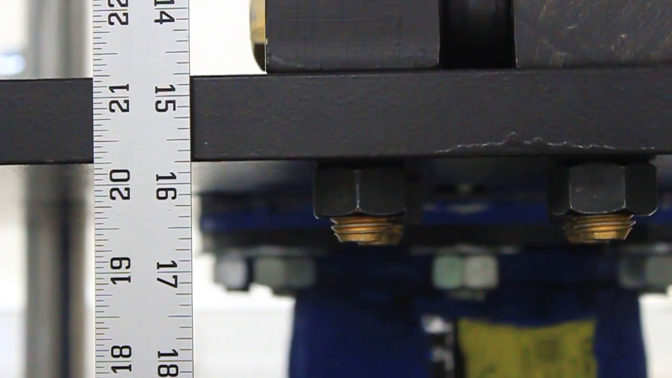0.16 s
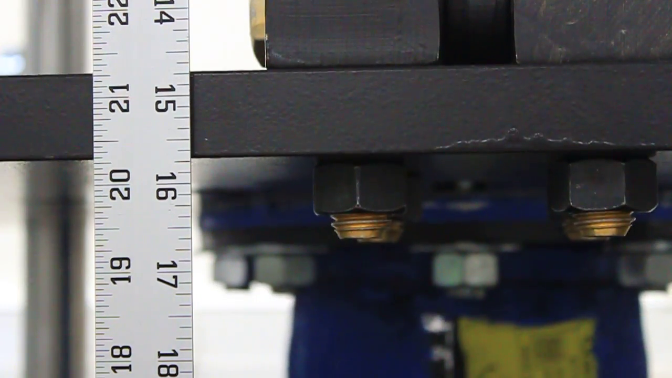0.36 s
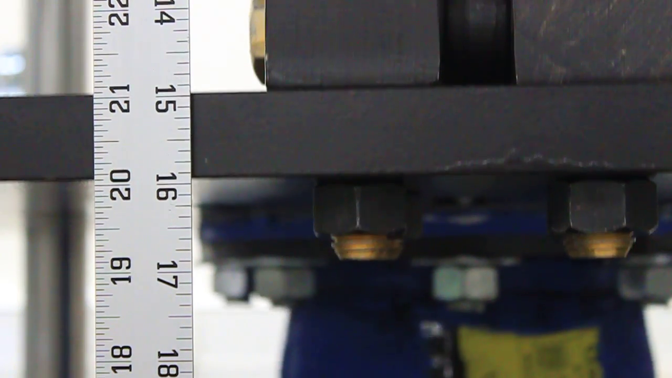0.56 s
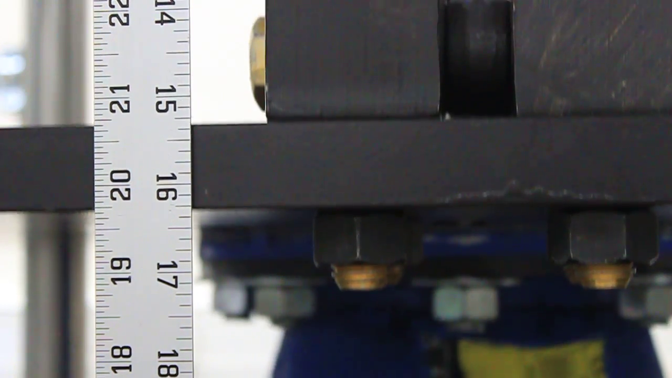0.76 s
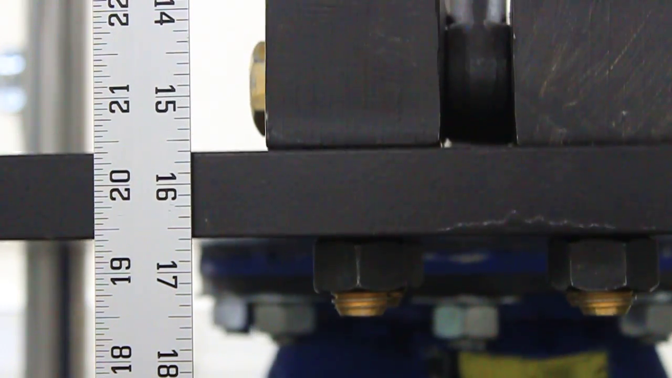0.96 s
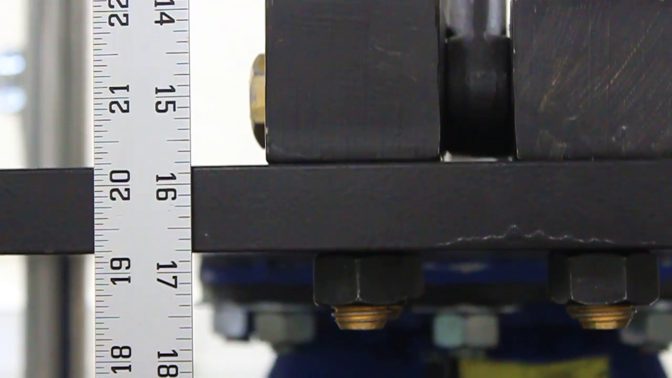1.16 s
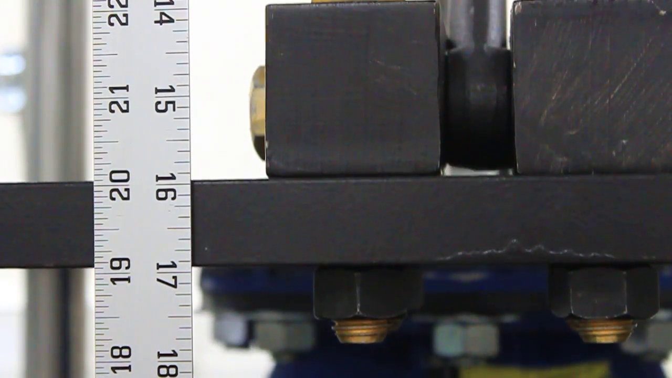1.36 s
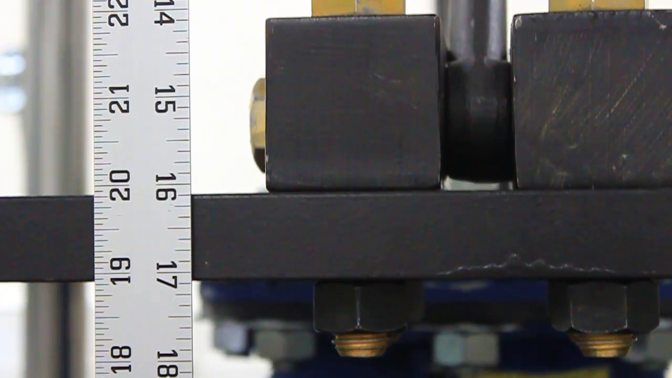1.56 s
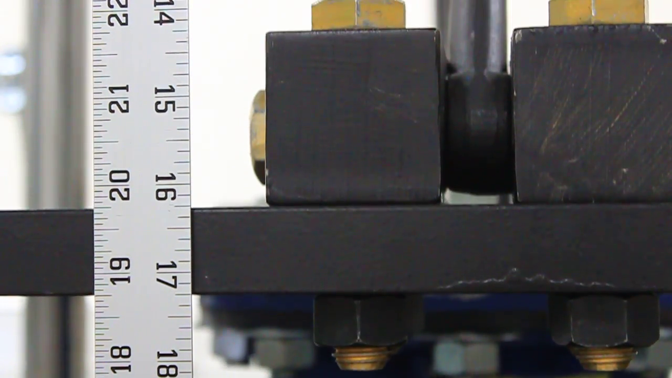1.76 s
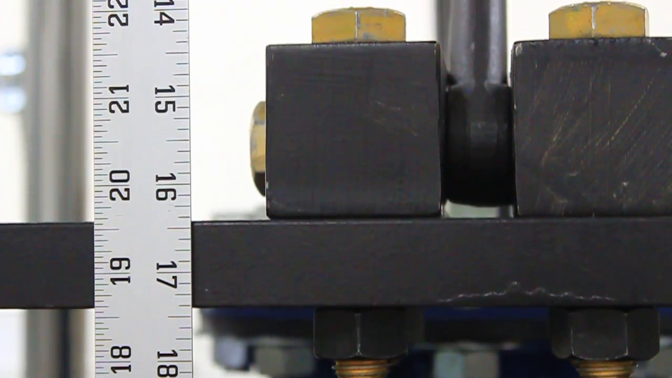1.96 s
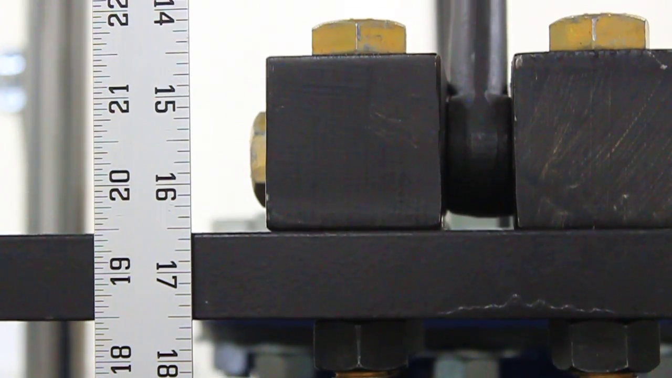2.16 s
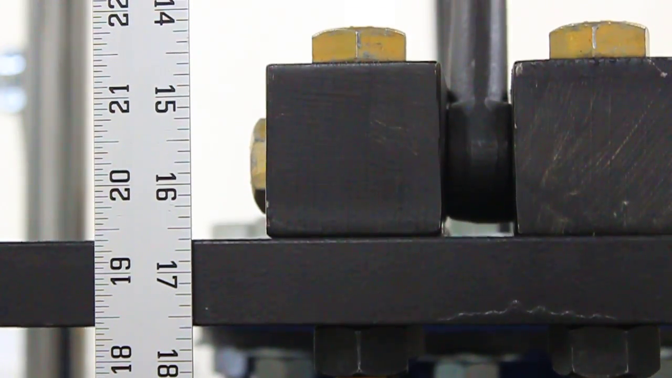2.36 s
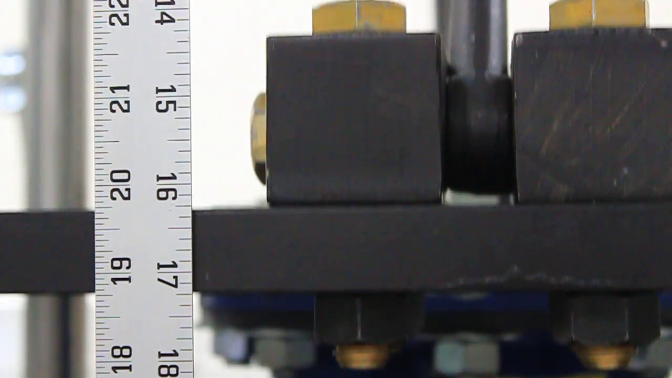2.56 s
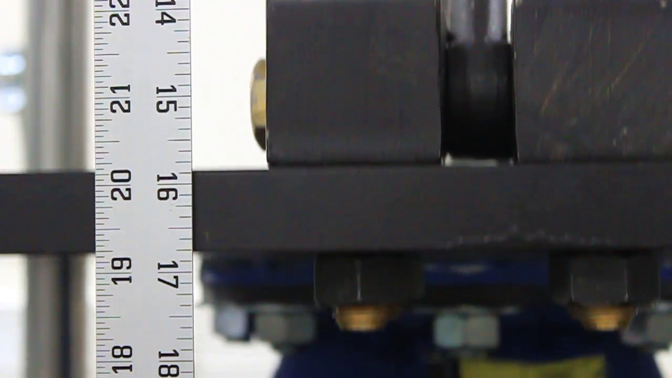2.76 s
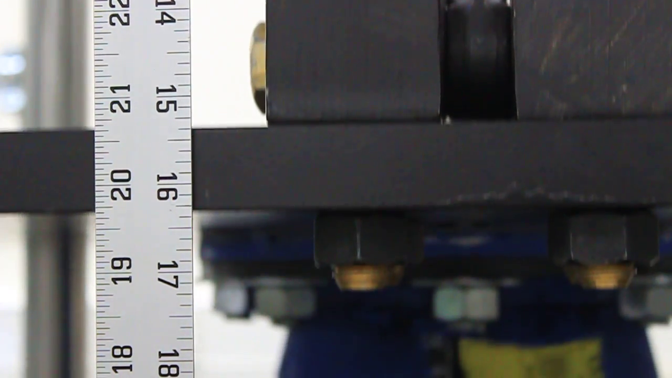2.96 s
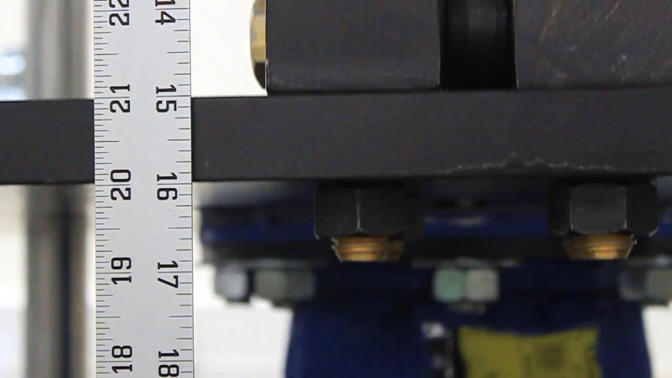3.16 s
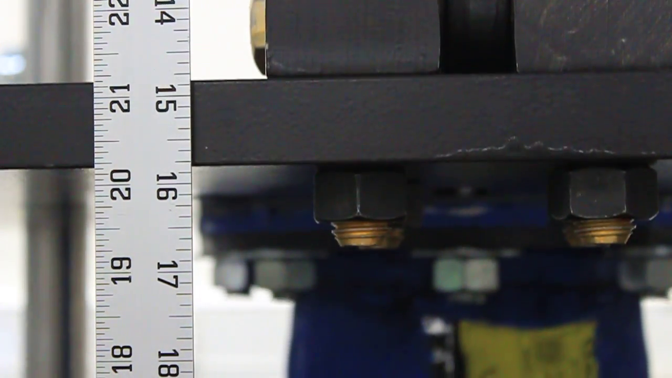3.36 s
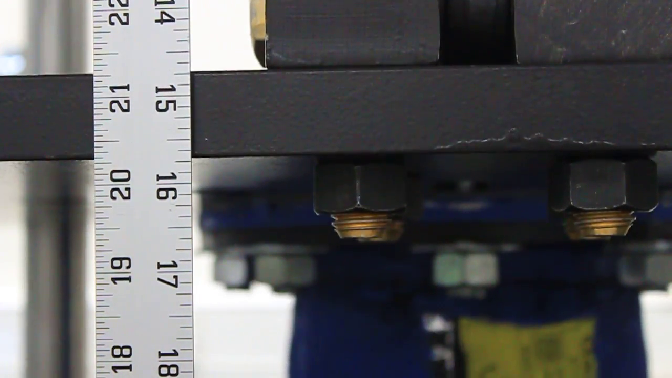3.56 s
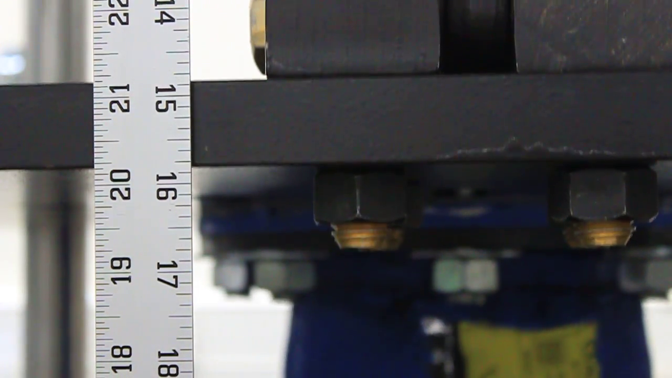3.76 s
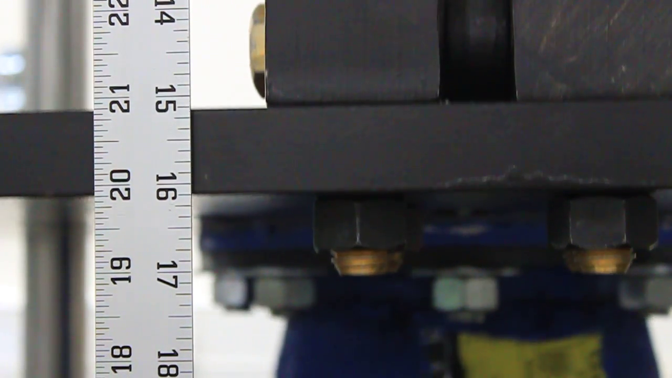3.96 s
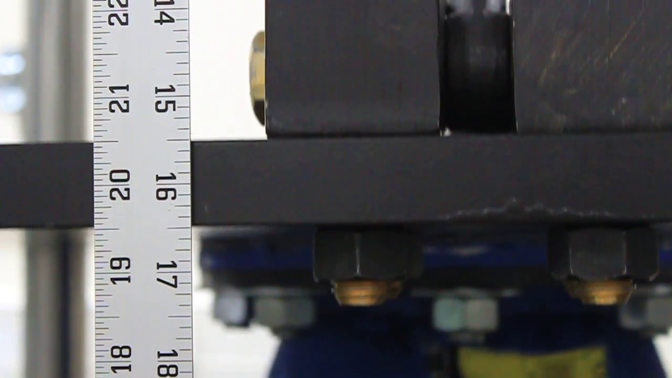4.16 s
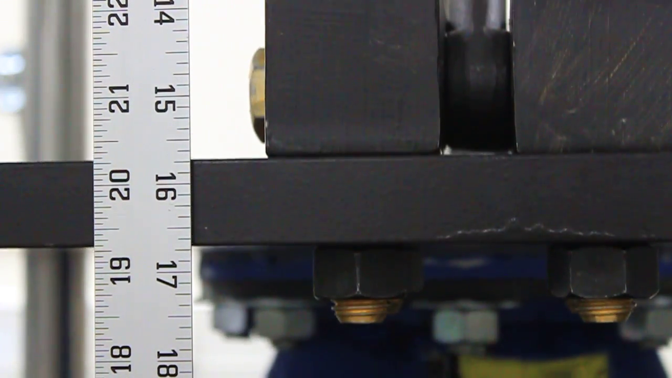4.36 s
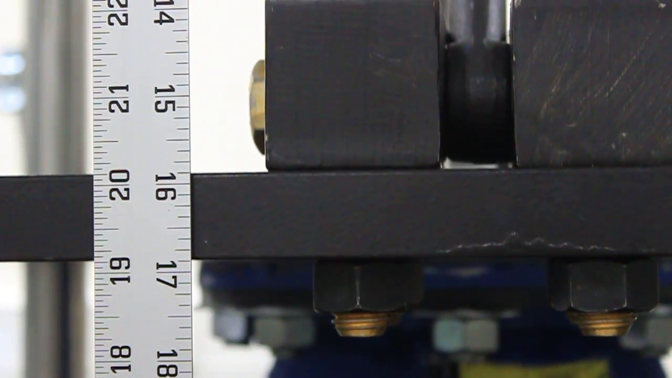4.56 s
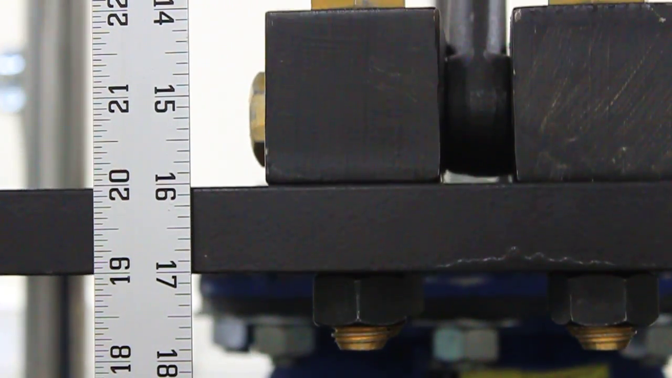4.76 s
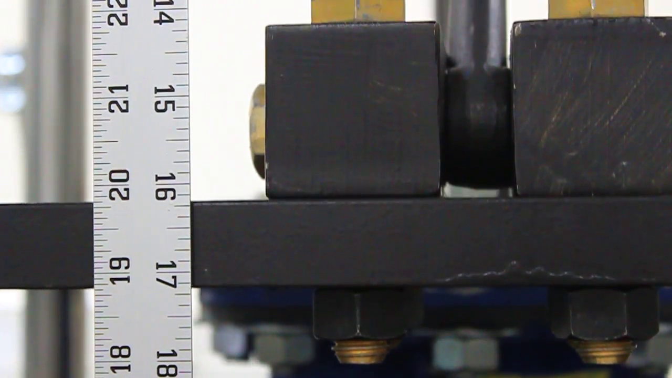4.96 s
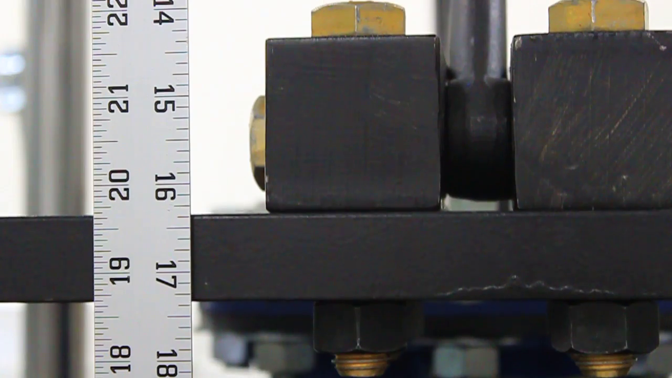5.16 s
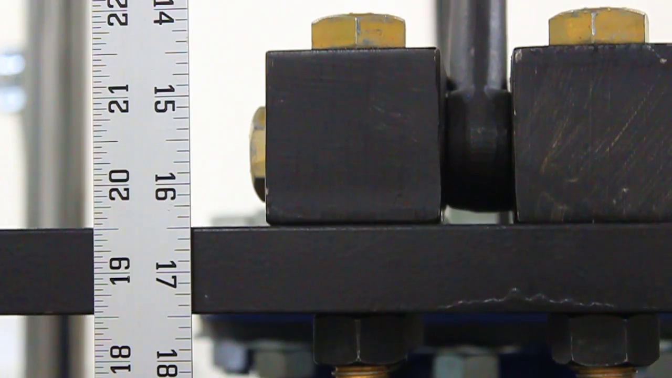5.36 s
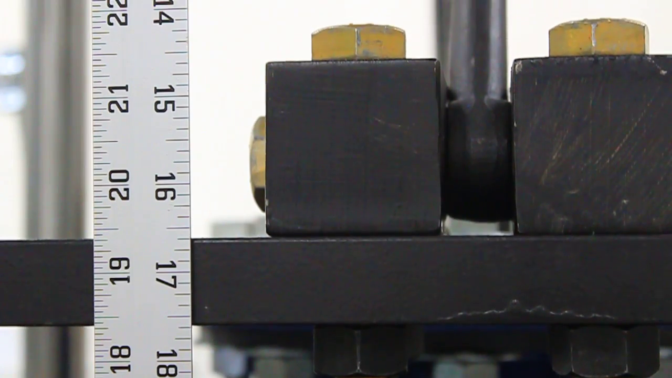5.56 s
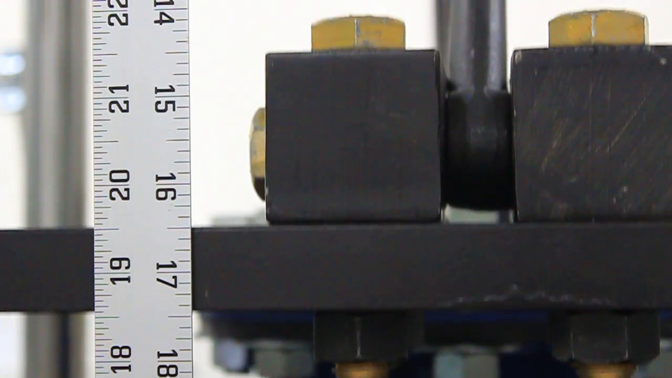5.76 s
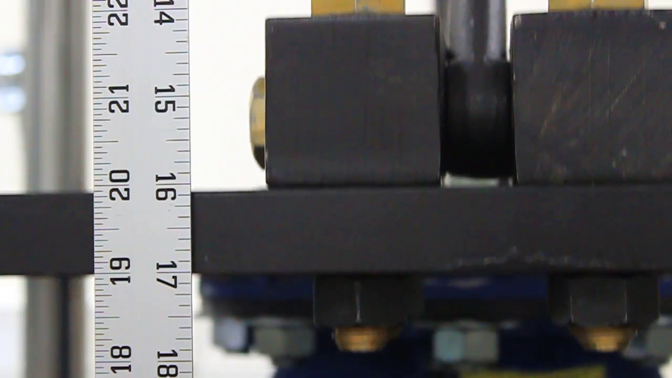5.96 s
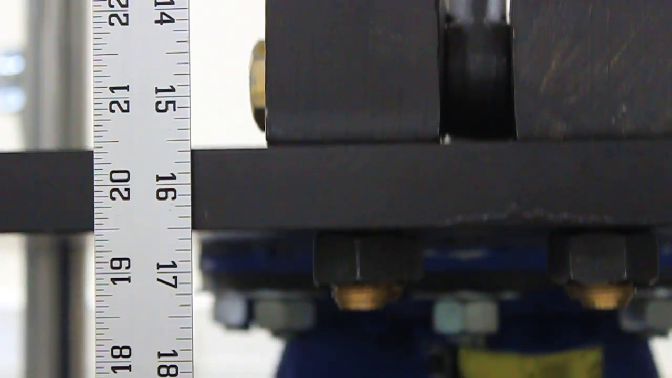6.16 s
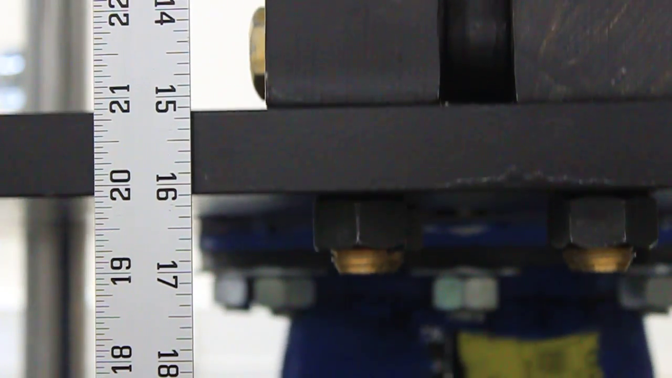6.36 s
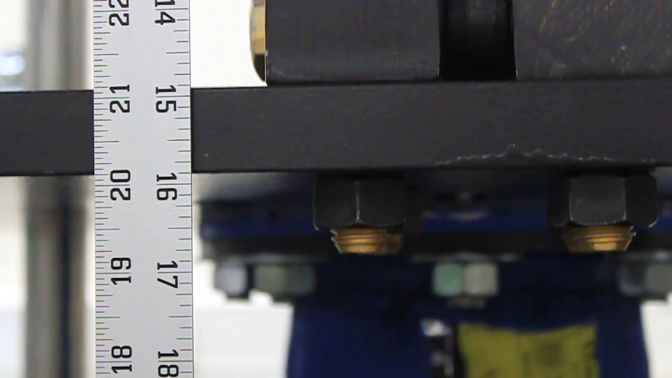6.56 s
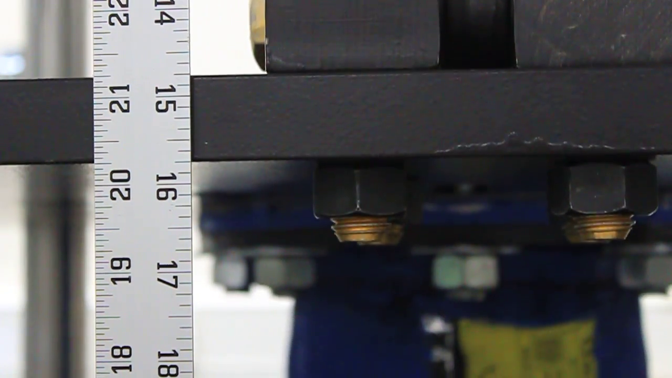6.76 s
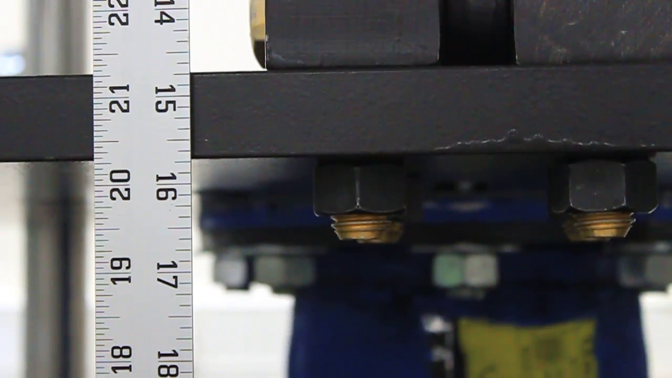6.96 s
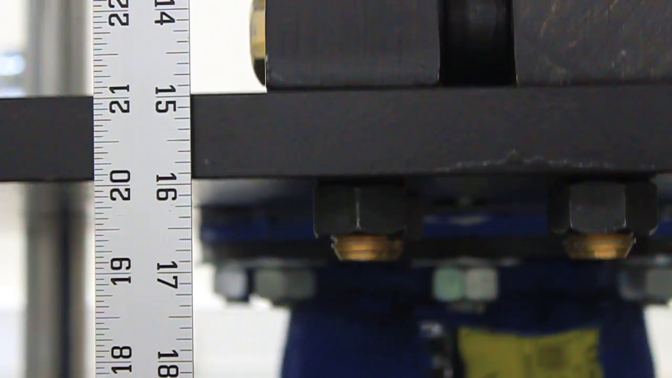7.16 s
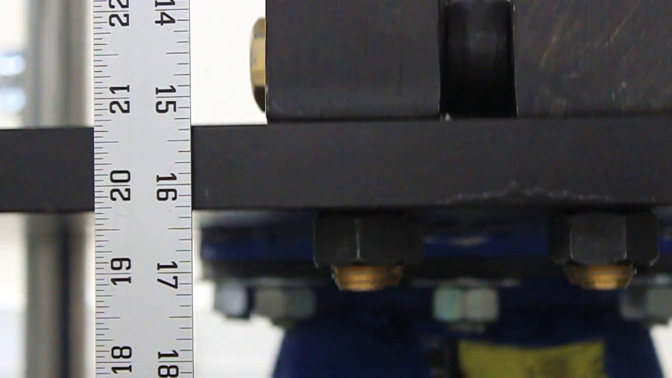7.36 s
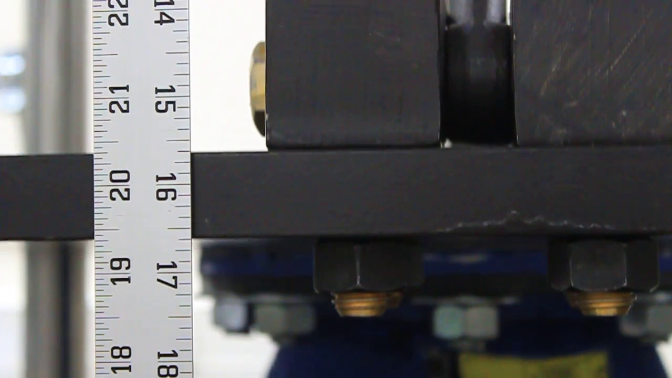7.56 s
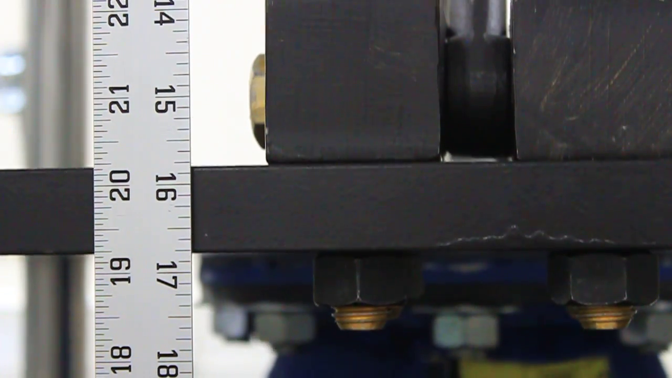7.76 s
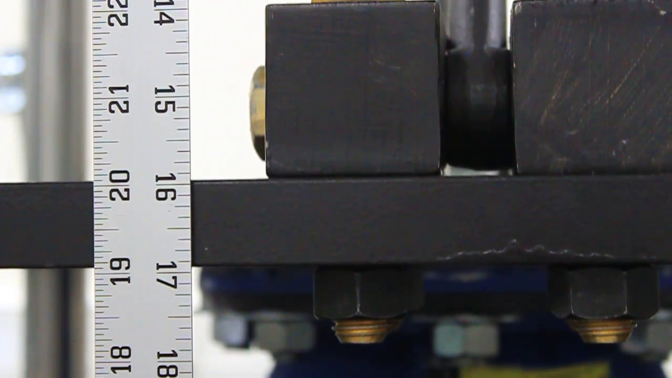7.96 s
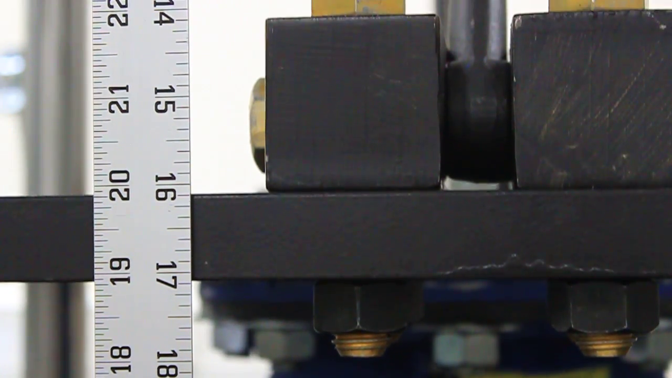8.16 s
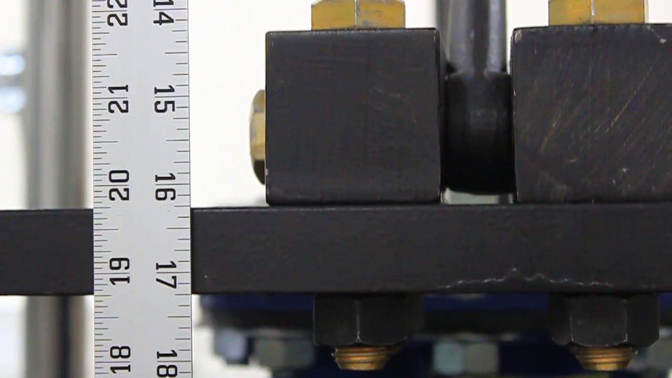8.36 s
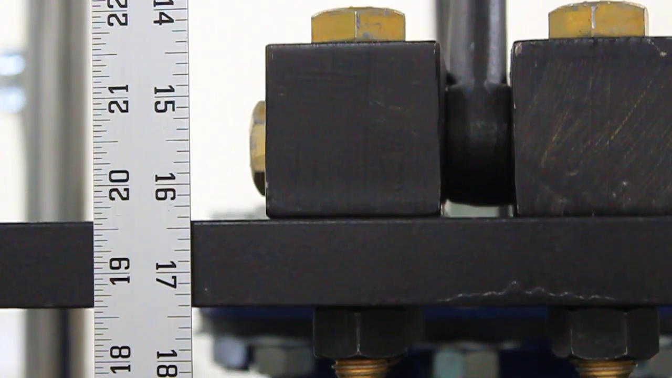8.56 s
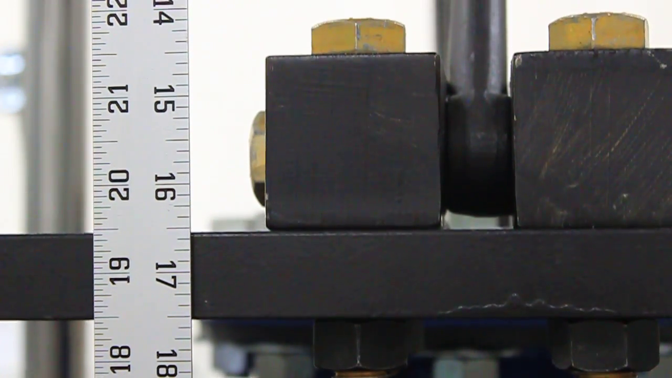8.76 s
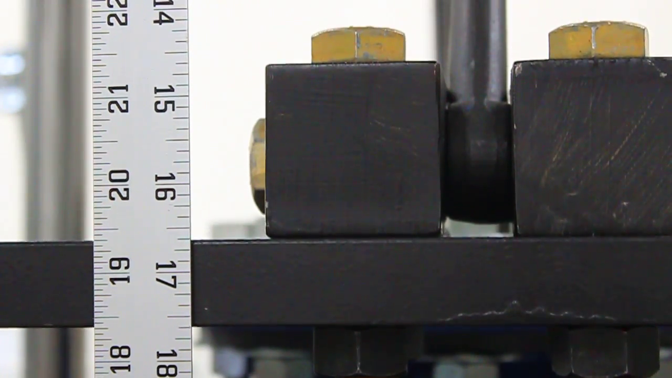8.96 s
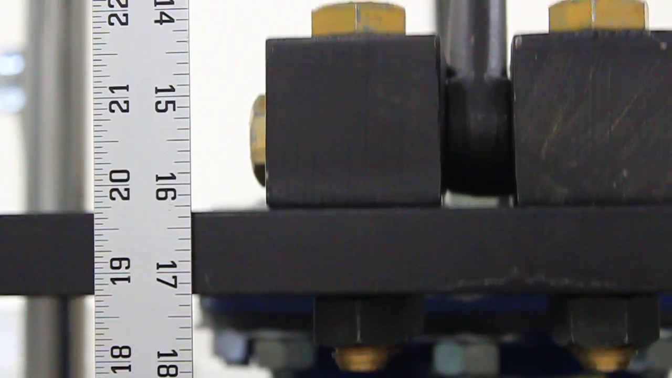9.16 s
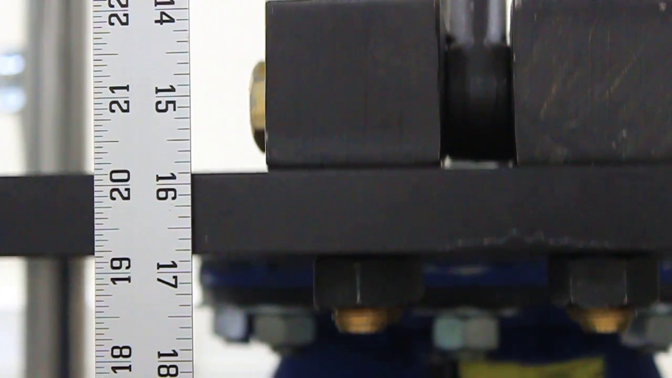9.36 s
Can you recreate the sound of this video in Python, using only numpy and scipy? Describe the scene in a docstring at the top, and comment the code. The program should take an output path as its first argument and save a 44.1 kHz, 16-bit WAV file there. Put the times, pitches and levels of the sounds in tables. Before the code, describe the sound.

Close, dry, mono sound of a pneumatic cylinder driving a steel rig in a workshop. It begins mid-lift with bright, steady air hiss. At about 0.26 s a tick, thump and sharp puff cut it off; a rushing exhaust swells by 0.7 s, then darkens and fades towards 2.2 s, with faint dull guide rubbing near the end. At 2.3 s a stronger knock and spit of air start a lifting hiss, surging and then almost steady until 3.55 s. Another tick, puff and thump lead into a fading descent hiss until 5.6 s. A heavy reversal starts the next lift, lasting to 6.85 s; the third descent dies away by 8.9 s. A last thump and puff launch a steady hiss that continues to the end. Quiet ventilation and unsteady low hum remain behind, with a short room tail.

```python
"""Pneumatic lift rig in a workshop

A cylinder moves a rig close to a mono microphone: from mid-lift, down and up three times, ending in a lift.
At each reversal the solenoid ticks, the valve thumps and spits a puff of air, and the frame rings.
Shaped noise makes the exhaust hiss: nearly steady on lifts, dying with the pressure on descents.
Dull noise is the guide rubbing; ventilation noise and three unsteady tones hum behind, with a short room tail.
"""
import sys
import numpy as np
from scipy import signal
from scipy.fft import rfft, irfft, next_fast_len
from scipy.io import wavfile
from scipy.ndimage import map_coordinates

SR = 44100
rng = np.random.default_rng(int(sys.argv[2]) if len(sys.argv) > 2 else 0)


def transcribe(u):
    """Save the signal u as a 16-bit wav file named by the first command-line argument.

    u: samples, shape (n,) or (channels, n), limited to [-1, 1]; the rate is SR.
    q: integer samples, one column per channel.
    """
    v = np.clip(np.atleast_2d(u).T, -1, 1)
    q = np.round(v * 32767).astype(np.int16)
    wavfile.write(sys.argv[1], SR, q)


N = 414979
T = np.arange(N) / SR

# Exhaust on lifts: open_s, close_s, flow_db
LIFTS = [(-.92, 0.31, -22.4), (2.379, 3.565, -21.7), (5.679, 6.87, -21.8), (8.992, 10.1, -22.3)]
# Exhaust on descents: open_s, close_s, flow_db, loss_db in the first second after the crest
DESCENTS = [(.435, 2.29, -22.8, 8.8), (3.726, 5.59, -22.9, 8.9), (7.035, 8.9, -23.3, 10.0)]
# Muffler hiss spectra: freq_hz, density_db (relative, per Hz)
LIFT_HISS = [(100, -38), (330, -24), (600, -12.5), (1000, -14), (1500, -10.5), (2100, -9), (3000, -5.5),
             (5200, -6.5), (6200, -11.5), (7700, -16.5), (9000, 1), (10900, -15), (12500, -13.2),
             (15600, -12.5)]
DESCENT_HISS = [(100, -27), (290, -15), (430, -8.5), (620, -7), (1000, -4), (2000, -5), (3000, -1.5),
                (5200, -3), (6200, -8.5), (7700, -7), (9000, .5), (10900, -10), (12500, -10), (15600, -9)]
# Resonances and notches of each exhaust path: center_hz, width_hz, gain_db
LIFT_MODES = [(579, 31, -12), (1012, 50, 3.5), (1421, 36, 2.5), (1470, 36, 9.5), (1682, 36, 6),
              (1850, 36, 5.5), (2210, 36, 0), (2330, 36, 4.5), (3110, 36, 3), (3273, 32, 3.5),
              (3478, 33, 5), (3500, 36, 4), (3880, 36, 3.5), (4479, 44, -3), (4680, 36, -9), (4660, 36, 7),
              (5240, 33, -6), (5830, 36, -4.4), (6370, 85, -4.3), (6600, 140, 3.0), (6900, 50, 5),
              (7300, 50, 3), (8300, 50, 7), (8380, 50, -6.6), (8656, 50, -6.5), (8872, 50, -9.9),
              (9480, 260, -4), (11140, 85, 6), (12360, 85, -4.9)]
DESCENT_MODES = [(571, 33, -5), (1292, 32, -4.7), (1695, 36, -3), (1720, 36, 2.5), (2120, 36, -12),
                 (2220, 36, 6), (2510, 36, -1), (2610, 38, 10), (3210, 28, 3), (3445, 30, 7),
                 (3480, 50, -6), (3800, 36, -7), (4250, 70, 7.5), (4380, 29, 9), (4600, 140, 3.5),
                 (5400, 25, 10), (5930, 36, 12), (6000, 50, -8), (7700, 85, -4.9), (7800, 50, 8),
                 (8000, 85, -11.4), (8030, 85, -7), (9948, 50, -6.8), (10276, 79, 12.5),
                 (10900, 140, -12.1), (11197, 85, 6.5), (12134, 85, 7.9), (12909, 85, 6.8),
                 (13000, 85, 5.0), (13717, 85, 6)]
# Resonances and notches of the steelwork, shared by both mufflers: center_hz, width_hz, gain_db
STEELWORK_MODES = [(1055, 63, 3.7), (1224, 42, 8.5), (1518, 36, -2), (1560, 50, 4.5), (1744, 36, 4),
                   (1915, 36, -4.0), (2146, 33, 3), (2272, 36, -3.5), (2422, 31, 6.5), (2910, 36, 6),
                   (3058, 52, 6.0), (3750, 32, 5.5), (3985, 33, 5.5), (4080, 31, -6), (5920, 120, -6),
                   (7070, 46, 6.5), (7470, 79, -5.2), (8690, 50, -9.1), (8980, 140, -10.4), (9173, 50, -10),
                   (9750, 85, -6), (10454, 85, 3.5), (11370, 150, 7.5), (11843, 140, -2), (13300, 85, 6),
                   (13500, 260, 2.5), (14524, 85, 5), (14739, 260, 5)]
# Jet brightening with flow: freq_hz, growth_db_per_db
LIFT_GROWTH = [(500, 0.3), (1600, 1.93), (3000, 0.95), (5000, 1.47), (7000, 1.6), (14000, 1.75)]
DESCENT_GROWTH = [(400, 0.8), (1150, 0.84), (1500, 1.32), (2050, 1.4), (2700, .9), (5200, 0.97),
                  (6500, 1.15), (14000, 1.42)]
# Valve shifts: shift_s, thump_db (relative), puff_db, way (stroke that follows)
SHIFTS = [(0.261, -30, -19.3, "down"), (2.2915, -23, -18.3, "up"), (3.548, -33, -17.8, "down"),
          (5.5915, -24.5, -18.3, "up"), (6.852, -32, -18.5, "down"), (8.904, -25, -17.5, "up")]
# Spectra of air spat from the valve and air in the hose: freq_hz, density_db (relative, per Hz)
PUFF_SPECTRUM = [(120, -43), (200, -19.5), (407, -9.5), (874, -11), (1480, -1.5), (2020, -8.5), (2420, -5),
                 (3550, -2.5), (4840, -3), (5700, -7.5), (7350, -9.5), (8500, -2.5), (11800, -9),
                 (13400, -3.5), (15500, -6)]
HOSE_SPECTRUM = [(150, -31), (350, -22), (700, -3.5), (1200, -1.5), (1900, -4.5), (2800, 2), (4000, 1),
                 (5200, 1), (6200, -9), (9500, -8), (15500, -18)]
# Frame shudder spectrum: freq_hz, density_db (relative, per Hz)
THUD_SPECTRUM = [(30, -26), (65, -10), (110, -5), (180, -8), (330, -6), (600, -8), (1200, -12), (3000, -50)]
# Rig frame modes: freq_hz, level_db (relative), t60_s
FRAME_MODES = [(97, -11, 0.096), (130, 0.5, .08), (246, -11, 0.029), (355, 0, 0.015), (460, -14, 0.031)]
# Guide rubs: start_s, level_db, hold_s
RUBS = [(1.546, -45.5, 0.073), (1.9, -52, 0.46), (4.95, -53, 0.86), (8.3, -54, 0.64)]
# Guide rub spectrum: freq_hz, density_db (relative, per Hz)
RUB_SPECTRUM = [(40, -3), (70, -3), (170, 4.5), (300, 0.5), (650, -3), (1100, -8), (2500, -40)]
# Ventilation spectrum: freq_hz, density_db (relative, per Hz)
VENTILATION_SPECTRUM = [(20, -20), (40, -20), (60, -6), (90, -6), (160, 0), (260, -1), (450, -17.5),
                        (1000, -4.5), (2000, -4.5), (6000, -16), (15000, -22)]
# Machine hum: freq_hz, mean_level_db (rms)
HUM = [(56, -65.5), (177.6, -63.5), (360.7, -60)]
# Room decay: freq_hz, t60_s
ROOM_DECAY = [(100, 0.48), (1000, 0.53), (4000, 0.33), (14000, 0.086)]

SURGE_DB, SURGE_S, SAG_DB_PER_S = 2.3, 0.07, 1.15  # lift flow: initial surge, then slow sag
CREST_S, FALL_POWER = 0.3, 2.2  # descent flow: crest after opening, exponent of the dB loss
ROOM_DB = -11
LOW_CUT_HZ, TOP_HZ = 50, 15800


def amp(db):
    """Decibels to gain."""
    return 10 ** (np.asarray(db) / 20)


def unit(x):
    """Scale to rms 1."""
    return x / np.sqrt(np.mean(x ** 2) + 1e-20)


def along(points, hz):
    """Interpolate (freq_hz, value) points on a log frequency axis."""
    freq_hz, value = np.transpose(points)
    return np.interp(np.log(hz + 1), np.log(freq_hz + 1), value)


def wobble(knots_per_s):
    """Smooth random curve through normal knots."""
    knots = rng.standard_normal(int(N * knots_per_s / SR) + 4)
    return map_coordinates(knots, [T * knots_per_s])


def filtered(x, response):
    """Apply a gain that is a function of frequency."""
    size = next_fast_len(N + SR // 2)
    gain = response(np.fft.rfftfreq(size, 1 / SR))
    return irfft(rfft(x, size) * gain, size)[:N]


def noise(spectrum, modes=()):
    """Noise of rms 1 with a broad colour and narrow resonances or notches."""
    def response(hz):
        bells_db = sum(db / (1 + (2 * (hz - center) / width) ** 2) for center, width, db in modes)
        return amp(along(spectrum, hz) + bells_db)
    return unit(filtered(rng.standard_normal(N), response))


def decay(t, t60_s):
    """Exponential decay, 60 dB in t60_s."""
    return np.exp(-np.log(1000) * t / t60_s)


def burst(start_s, rise_s, hold_s, t60_s):
    """Envelope that rises, holds and dies away."""
    age = np.maximum(T - start_s, 0)
    fall = decay(np.clip((age - hold_s) / t60_s, 0, 2), 1)
    return (1 - np.exp(-age / rise_s)) * fall


def mufflers():
    """Two exhaust jets: the lifting one cracks open, the lowering one swells in more softly."""
    lift_hiss = scattered(noise(LIFT_HISS, LIFT_MODES + STEELWORK_MODES), scatter_db=-6)
    descent_hiss = scattered(noise(DESCENT_HISS, DESCENT_MODES + STEELWORK_MODES), scatter_db=-8)
    lift = exhaust(LIFTS, lift_flow, lift_hiss, LIFT_GROWTH, full_db=-23.5, gain_db=0,
                   opening_s=0.0095, closing_s=0.0096, flutter_db=0.3)
    descent = exhaust(DESCENTS, descent_flow, descent_hiss, DESCENT_GROWTH, full_db=-25, gain_db=0.5,
                      opening_s=0.024, closing_s=0.0054, flutter_db=0.31)
    return lift + descent


def exhaust(strokes, flow_law, hiss, growth, full_db, gain_db, opening_s, closing_s, flutter_db):
    """Flow sets the jet's level and brightness; the valve gates it."""
    flow_db, gate = np.full(N, float(full_db)), np.zeros(N)
    for open_s, close_s, *stroke in strokes:
        age = np.clip(T - open_s, 0, close_s - open_s)
        flow_db = np.where(T > open_s - 0.5, flow_law(age, *stroke), flow_db)
        opened = (1 + np.tanh((T - open_s) / opening_s)) / 2
        not_closed = (1 - np.tanh((T - close_s) / closing_s)) / 2
        gate += opened * not_closed
    flow_db = flow_db + flutter_db * wobble(45)
    hz, t, bins = signal.stft(hiss, SR, nperseg=256)
    excess_db = np.interp(t, T, flow_db) - full_db
    growth_gain = amp(along(growth, hz)[:, None] * excess_db)
    jet = signal.istft(bins * growth_gain, SR, nperseg=256)[1][:N]
    return amp(full_db + gain_db) * gate * jet


def lift_flow(age, flow_db):
    """Stored pressure surges out, then the rising piston pushes air almost steadily."""
    return flow_db + SURGE_DB * np.exp(-age / SURGE_S) - SAG_DB_PER_S * age


def descent_flow(age, flow_db, loss_db):
    """Flow crests early, then falls ever faster as the chamber empties."""
    return flow_db - loss_db * np.abs(age - CREST_S) ** FALL_POWER


def scattered(x, scatter_db, t60_s=0.05, corner_hz=5000):
    """Nearby bolts and rods reflect only short waves, rippling the treble finely."""
    t = np.arange(SR // 16) / SR
    echoes = rng.standard_normal(len(t)) * decay(t, t60_s) * (t > 0.002)
    reflected = signal.fftconvolve(x, echoes / np.linalg.norm(echoes))[:N]
    treble = filtered(reflected, lambda hz: hz ** 2 / (hz ** 2 + corner_hz ** 2))
    return unit(x + amp(scatter_db) * treble)


def reversals():
    """Valve and frame respond differently at the bottom and the top of the travel."""
    up, down = ([row[:-1] for row in SHIFTS if row[-1] == way] for way in ("up", "down"))
    bottom = valve(up, hold_s=0.019, t60_s=0.165) + rig(up, jolt_db=-42.5, boom_hz=74, boom_db=-41.5)
    top = valve(down, hold_s=0.015, t60_s=0.17) + rig(down, jolt_db=-51, boom_hz=93, boom_db=-37.5)
    return bottom + top


def valve(shifts, hold_s, t60_s):
    """Solenoid ticks, trapped air puffs out, fresh air rushes down the hose until the cylinder fills."""
    tick = sum(burst(s - 0.025, 0.0013, 0.0026, 0.42) for s, *_ in shifts)
    puff = sum(amp(puff_db) * burst(s + 0.0024, 0.0033, hold_s, t60_s) for s, _, puff_db in shifts)
    fill = sum(burst(s, 0.009, 0.66, 2.2) for s, *_ in shifts)
    spit = (puff + amp(-40) * tick) * noise(PUFF_SPECTRUM)
    return spit + amp(-36) * fill * noise(HOSE_SPECTRUM, STEELWORK_MODES)


def rig(shifts, jolt_db, boom_hz, boom_db):
    """Pressure step booms in the chamber and thumps the frame, which jolts as the piston breaks free."""
    ring, shudder = np.zeros(N), np.zeros(N)
    t = np.arange(SR // 3) / SR

    def mode(hz, t60_s):
        return decay(t, t60_s) * np.sin(2 * np.pi * hz * t)

    u = t / 0.00034
    push = amp(18) * u * (2 - u) * np.exp(-u)  # one pressure swing, out and back
    boom = amp(boom_db) * mode(boom_hz, t60_s=0.08)
    for shift_s, thump_db, _ in shifts:
        # each mode's level varies from thump to thump
        frame = sum(amp(db + rng.standard_normal()) * mode(hz, t60_s) for hz, db, t60_s in FRAME_MODES)
        start = round((shift_s + 0.001) * SR)
        ring[start:][:len(t)] -= amp(thump_db - 7) * (frame + push) + boom
        shudder += amp(thump_db - 9) * burst(shift_s + 0.0013, 0.0022, 0.0054, 0.25)
        shudder += amp(jolt_db) * burst(shift_s + 0.05, 0.004, 0.016, 0.17)
    return ring + shudder * noise(THUD_SPECTRUM)


def guide():
    """Guide rubs dully late in each descent: low noise under slow-fading bursts."""
    rubbing = sum(amp(db) * burst(start_s, 0.01, hold_s, 0.93) for start_s, db, hold_s in RUBS)
    return rubbing * noise(RUB_SPECTRUM)


def workshop():
    """Ventilation noise and machine hum, its tones unsteady in level and phase."""
    hum = np.zeros(N)
    for hz, level_db in HUM:
        level = amp(level_db + 1.3 * wobble(3.4)) * np.sqrt(2)
        hum += level * np.sin(2 * np.pi * hz * T + 1.2 * wobble(6))
    return amp(-48) * noise(VENTILATION_SPECTRUM) + hum


def room(x):
    """Short diffuse tail, 5 ms late, whose treble dies first."""
    hz, t, bins = signal.stft(rng.standard_normal(SR // 2), SR, nperseg=256)
    fading = bins * decay(t, along(ROOM_DECAY, hz)[:, None])
    tail = signal.istft(fading, SR, nperseg=256)[1]
    return signal.fftconvolve(x, np.pad(tail / np.linalg.norm(tail), (SR // 200, 0)))[:N]


def scene():
    """Sum all sources, the same in both channels."""
    machine = mufflers() + reversals() + guide()
    mono = machine + amp(ROOM_DB) * room(machine) + workshop()
    return np.array([mono, mono])


def record(dry):
    """Microphone path: steep deep-bass cut, nothing from TOP_HZ up."""
    low_cut = signal.butter(6, LOW_CUT_HZ, "highpass", fs=SR, output="sos")
    thin = signal.sosfilt(low_cut, dry)
    return np.array([filtered(channel, lambda hz: hz < TOP_HZ) for channel in thin])


dry = scene()
out = record(dry)
transcribe(out)
```